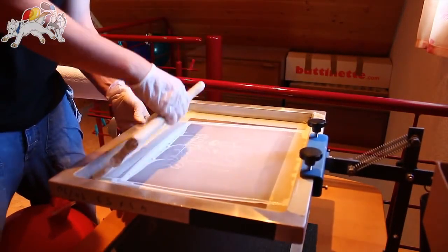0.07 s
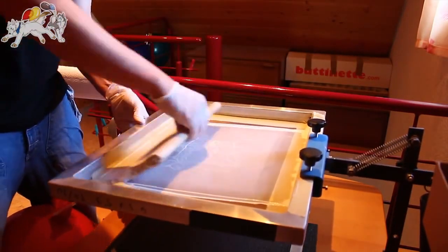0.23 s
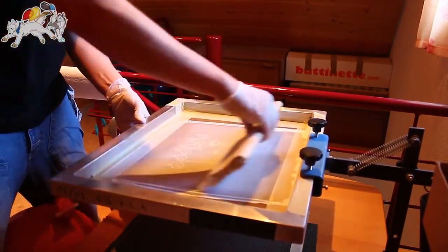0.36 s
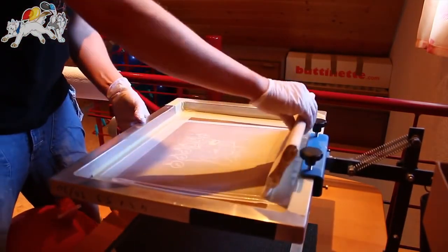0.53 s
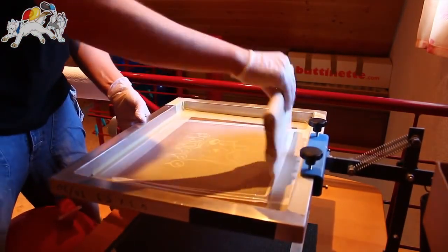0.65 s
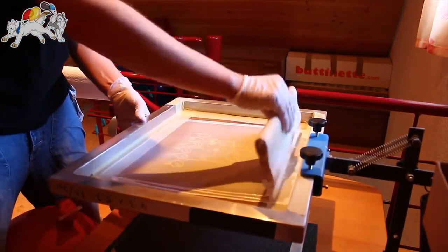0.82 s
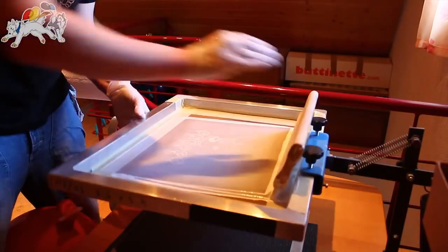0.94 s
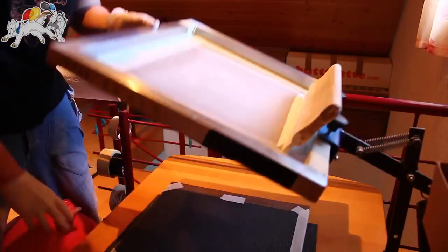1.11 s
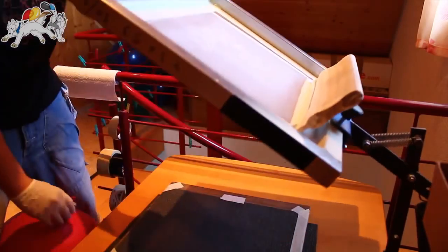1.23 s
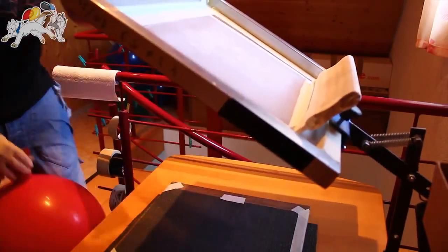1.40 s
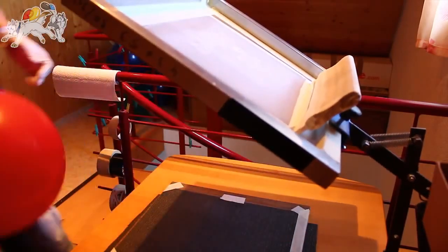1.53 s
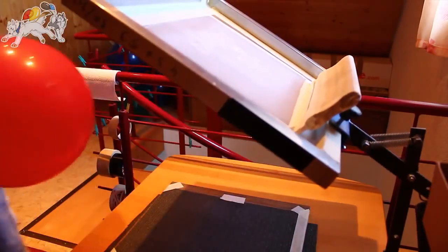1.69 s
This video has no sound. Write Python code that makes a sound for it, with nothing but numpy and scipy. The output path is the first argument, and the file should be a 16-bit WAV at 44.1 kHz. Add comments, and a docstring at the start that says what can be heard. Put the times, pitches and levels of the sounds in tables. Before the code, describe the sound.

A rubber squeegee taps, scrapes and squeaks across a mesh screen, then knocks down.

```python
"""Over faint room air, a rubber squeegee lands on a printing screen with a hollow tap, then scrapes and squeaks.
The blade zips over the mesh threads, so the squeak's pitch follows the speed of the stroke, down to a
juddering stop. The squeegee knocks on the frame and its handle tips back onto its rest. Cloth rustles,
the hinged frame is lifted with small clacks and creaks, and something bumps at the bench.
Short reflections and a brief tail place it all in a small wooden room."""
import sys
import numpy as np
from scipy import signal
from scipy.fft import rfft, irfft
from scipy.io import wavfile

SR = 44100
rng = np.random.default_rng(int(sys.argv[2]) if len(sys.argv) > 2 else 0)


def waveform_to_disk(signal):
    """Save audio, clipped to [-1, 1], as 16-bit WAV at the path in sys.argv[1]."""
    frames = np.transpose(np.atleast_2d(signal))
    scaled = np.clip(frames, -1, 1) * 32767
    samples = np.round(scaled).astype(np.int16)
    wavfile.write(sys.argv[1], SR, samples)


N = 77175
T = np.arange(N) / SR
FREQS = np.fft.rfftfreq(N, 1 / SR)


def amp(db):
    """Decibels to gain."""
    return 10 ** (np.asarray(db) / 20)


def unit_rms(x):
    """Scales to an rms of 1."""
    return x / np.sqrt(np.mean(x ** 2) + 1e-20)


def at_hz(points, hz):
    """Reads a curve along a log-frequency axis."""
    f, value = np.transpose(points)
    return np.interp(np.log(hz + 1), np.log(f + 1), value)


def automation(points):
    """Draws a control curve through (time, value) points."""
    return np.interp(T, *np.transpose(points))


def add(mix, start, sound):
    """Mixes a sound in at a time in seconds."""
    part = mix[round(start * SR):][:len(sound)]
    part += sound[:len(part)]


def eq(x, shape):
    """Minimum-phase EQ with a (frequency, gain) shape."""
    size = 2048
    log_gain = np.log(amp(at_hz(shape, abs(np.fft.fftfreq(size, 1 / SR)))))
    taps = np.fft.ifft(np.exp(np.conj(signal.hilbert(log_gain)))).real
    return signal.fftconvolve(x, taps[:size // 2])[:len(x)]


def wander(hz):
    """Smooth random modulation up to about the given rate, rms 1."""
    return unit_rms(irfft(rfft(rng.standard_normal(N)) * np.exp(-(FREQS / hz) ** 2), N))


def wavering_phase(hz, depth, rate_hz=687):
    """Phase of a tone whose pitch jitters by the fraction `depth`."""
    return 2 * np.pi * np.cumsum(hz * (1 + depth * wander(rate_hz))) / SR


def swell(start, end):
    """A half-sine fade in and out."""
    return np.sin(np.pi * np.clip((T - start) / (end - start), 0, 1))


def scrape(level, shape, grain_db, grain_hz):
    """Friction: noise made grainy by tiny slips, then shaped in tone and level."""
    slips = rng.standard_normal(N) * amp(grain_db * wander(grain_hz))
    return unit_rms(eq(slips, shape)) * amp(automation(level))


def knocks(hits, modes, rattle_eq, tick, low_cut_hz):
    """Each blow rings modes and a ticking rattle; soft ones are duller, the spot sets the first mode."""
    out, t = np.zeros(N), T[:SR // 2]
    impulse = 1. * (t == 0)
    first, *others = [(-1) ** k * amp(db - 60 * t / t60) * np.sin(2 * np.pi * hz * t)
                      for k, (hz, db, t60) in enumerate(modes)]
    eq_gain = np.linalg.norm(eq(impulse, rattle_eq))
    for start, ring_db, rattle_db, bright_hz, t60, first_db in hits:
        ring = amp(ring_db) * (amp(first_db) * first + sum(others))
        burst = rng.standard_normal(len(t)) * amp(-60 * t / t60) + tick * impulse
        rattle = amp(rattle_db) * eq(burst, rattle_eq) / eq_gain
        pole = np.exp(-2 * np.pi * bright_hz / SR)
        add(out, start, signal.lfilter([1 - pole], [1, -pole], ring + rattle))
    low_cut = signal.butter(1, low_cut_hz, "high", fs=SR, output="sos")
    return signal.sosfilt(low_cut, out)  # small objects radiate little bass


# stereo width of diffuse sound (frequency [Hz], left-right correlation [-1 to 1])
CORRELATION = [(30, -0.64), (300, 0.83), (1000, 0.67), (3000, 0.17), (15000, -0.06)]

def diffuse(shape):
    """Mid-side stereo noise with a (frequency, level) shape."""
    mid, side = rfft(rng.standard_normal((2, N))) * amp(at_hz(shape, FREQS))
    alike = np.clip(at_hz(CORRELATION, FREQS), -1, 1)
    mid, side = mid * np.sqrt((1 + alike) / 2), side * np.sqrt((1 - alike) / 2)
    return irfft(np.array([mid + side, mid - side]), N)


# tone of the room air (frequency [Hz], gain [dB]) and its fader (time [s], level [dB])
AIR_EQ = [(25, -19), (50, -34), (78, -11), (120, -41.5), (175, -9), (235, -14), (350, -1.5), (420, 0.5),
          (510, -13), (610, -3.5), (730, -12), (1500, -10.5), (2300, -15.5), (6000, -19), (16000, -24)]
AIR_LEVEL = [(0, -63.5), (.85, -63.5), (1.2, -60.5), (1.45, -59), (1.65, -59.5), (1.75, -55.5)]

def room_air():
    """A faint bed of air that comes up a little toward the end."""
    return unit_rms(diffuse(AIR_EQ)) * amp(automation(AIR_LEVEL))


# tone of the floor rumble (frequency [Hz], gain [dB]) and its fader (time [s], level [dB])
RUMBLE_EQ = [(20, -21), (50, -17.5), (78, -9), (130, -15.5), (300, -24.5), (1000, -61)]
RUMBLE_LEVEL = [(0, -104), (.33, -96.5), (.6, -98.5), (.85, -87), (.97, -71.5), (1.15, -89), (1.45, -83.5),
                (1.57, -68), (1.67, -76.5), (1.75, -85.5)]

def floor_rumble():
    """Low swells as weight shifts on the floor."""
    return unit_rms(diffuse(RUMBLE_EQ)) * amp(automation(RUMBLE_LEVEL))


# resonances of the mesh (frequency [Hz], level [dB], t60 [s])
MESH_MODES = [(354.8, 0, 0.1), (424.6, 1, 0.093), (583, -16, 0.1), (757, -8, 0.048), (830, -12.5, 0.11),
              (1045, -29, 0.12), (1178, -23.5, 0.19), (1444, -24.5, 0.19), (1860, -13.5, 0.065),
              (4070, -16, 0.012)]
# its dense ringing (frequency [Hz], gain [dB])
MESH_RATTLE = [(30, -36), (150, -19.5), (350, -1.5), (700, 4), (1000, 4.5), (1900, -7), (2600, -7.5),
               (3700, -3.5), (5000, -12), (8500, -11.5), (16000, -35)]
# touchdown (time [s], ring [dB], rattle [dB], brightness [Hz], rattle t60 [s], first mode [dB])
MESH_HITS = [(.1975, -65.5, -51.5, 8900, 0.28, 4), (.2150, -20.5, -31.5, 12200, 0.076, 1)]

def mesh_tap():
    """The blade grazes the mesh, then lands and sets it ringing."""
    return knocks(MESH_HITS, MESH_MODES, MESH_RATTLE, tick=1.5, low_cut_hz=124)


# tone of rubbing rubber (frequency [Hz], gain [dB]) and its fader (time [s], level [dB])
RUBBER_EQ = [(60, -34.5), (200, -38), (330, -26), (700, 5), (1300, 3.5), (1800, 5), (2600, 4.5),
             (4000, 4.5), (8000, 3.5), (11000, -3.5), (16000, -11)]
RUB_LEVEL = [(.275, -83), (.301, -40.5), (.314, -34), (.332, -36), (.339, -72.5), (.40, -56.5), (.45, -63),
             (.535, -58.5), (.56, -65), (.6, -93.5)]

def rubber_rub():
    """Rubber scrapes over the mesh, loudest as the stroke gets going."""
    return scrape(RUB_LEVEL, RUBBER_EQ, grain_db=0.5, grain_hz=900)


# resonances of the rubber blade (frequency [Hz], level [dB], t60 [s])
BLADE_MODES = [(1760, 3, 0.017), (409, -7, 0.045), (757, -3, 0.035), (1090, -3, .035), (2180, -5, 0.016)]
# snaps (time [s], ring [dB], rattle [dB], brightness [Hz], rattle t60 [s], first mode [dB])
BLADE_HITS = [(.322, -41, -33, 3000, 0.017, -6), (.3283, -29, -34.5, 5000, .025, 4),
              (.401, -49.5, -41, 1000, 0.033, -21.5)]

def blade_snaps():
    """The heavily damped blade snaps free as it starts to slide, and catches on the way."""
    return knocks(BLADE_HITS, BLADE_MODES, RUBBER_EQ, tick=1.6, low_cut_hz=130)


# speed of the stroke (time [s], thread-crossing rate [Hz])
THREAD_RATE = [(.322, 12500), (.331, 13400), (.343, 12000), (.352, 12600), (.362, 15100), (.378, 15600),
               (.397, 13590), (.409, 15000), (.430, 13450), (.442, 14830), (.456, 14500), (.475, 15050),
               (.503, 15100), (.514, 12800), (.525, 10750), (.534, 11270), (.544, 8000), (.555, 7564),
               (.565, 7700)]
# fader of the squeak (time [s], level [dB])
SQUEAK_LEVEL = [(.33, -20), (.351, -25.5), (.358, -34), (.403, -33.5), (.411, -22.5), (.445, -28.5),
                (.478, -29), (.497, -33), (.511, -23.5), (.534, -27), (.542, -29.5), (.55, -26),
                (.556, -34.5), (.563, -23), (.567, -73)]

def squeak(start_s=.329, attack_s=.0015, flutter_db=3.5, flutter_hz=250):
    """The blade ticks over the threads: a raspy, fluttering tone whose pitch follows its speed."""
    pitch = automation(THREAD_RATE)
    phase = wavering_phase(pitch, depth=0.01628)
    octave = amp(-19) * np.sin(2 * phase) * (pitch < SR / 4)  # muted where it would alias
    # a narrow and a wide band of noise ride along with the pitch
    rasp = sum(amp(db) * (wander(width_hz) * np.sin(phase) + wander(width_hz) * np.cos(phase))
               for db, width_hz in [(-16.5, 900), (-17.5, 4300)])
    level = amp(automation(SQUEAK_LEVEL) + flutter_db * wander(flutter_hz))
    gate = np.clip((T - start_s) / attack_s, 0, 1) * (T < SQUEAK_LEVEL[-1][0])
    return level * gate * (np.sin(phase) + octave + rasp)


# glides of the blade's slow end (start [s], end [s], first pitch [Hz], last pitch [Hz], level [dB])
TRAILING_GLIDES = [(0.34, 0.403, 12400, 12170, -35.5), (0.407, .445, 14000, 13350, -32),
                   (.528, 0.57, 11100, 11200, -34.5), (0.537, 0.553, 10460, 4540, -32.5),
                   (0.548, 0.559, 7130, 3200, -37), (0.553, 0.568, 3000, 1680, -57)]

def trailing_squeaks(flutter_db=1, flutter_hz=900):
    """The slower end of the blade drags behind in weaker, stuttering squeaks that dive as it stops."""
    out = np.zeros(N)
    for start, end, first_hz, last_hz, db in TRAILING_GLIDES:
        pitch = automation([(start, first_hz), (end, last_hz)])
        out += amp(db) * swell(start, end) * np.sin(wavering_phase(pitch, depth=0.03))
    return out * unit_rms(amp(flutter_db * wander(flutter_hz)))


# tone of the judder (frequency [Hz], gain [dB]) and its fader (time [s], level [dB])
JUDDER_EQ = [(60, -70), (300, -47.5), (430, -6.5), (600, -34), (1300, -21), (1650, -1.5), (2600, -4),
             (4500, -3.5), (7000, 1.5), (11000, -7), (16000, -29)]
JUDDER_LEVEL = [(.533, -78), (.543, -49), (.553, -47), (.566, -35.5), (.578, -41.5), (.6, -105)]

def judder():
    """A coarse scrape as the blade stops against the frame."""
    return scrape(JUDDER_LEVEL, JUDDER_EQ, grain_db=5.5, grain_hz=700)


# resonances of the hinge clamps (frequency [Hz], level [dB], t60 [s])
HINGE_MODES = [(443, 3.5, 0.036), (658, 2, 0.033), (1042, -26, .06), (1149, -3.5, 0.1), (1282, -12, 0.11)]
# dense ringing of the frame, shared by hinge, frame and handle hits (frequency [Hz], gain [dB])
FRAME_RATTLE = [(30, -45), (160, -17.5), (270, 1.5), (750, -2), (1000, 4), (1600, -3), (2300, -10),
                (4400, -6.5), (5600, -19), (8000, -18), (16000, -31)]
# clacks (time [s], ring [dB], rattle [dB], brightness [Hz], rattle t60 [s], first mode [dB])
HINGE_HITS = [(.615, -55.5, -57.5, 1800, 0.055, 2), (1.148, -53.5, -52.5, 1500, 0.038, 2),
              (1.267, -44.5, -43.5, 1500, 0.05, -0.5), (1.279, -48.5, -53, 900, 0.12, 5.5),
              (1.393, -53, -45.5, 4500, 0.056, 0), (1.404, -47, -54, 1620, 0.083, 0)]

def hinge_clacks():
    """The frame shifts in its hinge clamps."""
    return knocks(HINGE_HITS, HINGE_MODES, FRAME_RATTLE, tick=2.3, low_cut_hz=203)


# resonances of the frame (frequency [Hz], level [dB], t60 [s])
FRAME_MODES = [(410, 1, 0.21), (350, -5.5, 0.038), (639, -9, 0.14), (902, -6, 0.042), (1074, -11.5, 0.16),
               (1367, -7, 0.059), (1402, -8, 0.11), (1510, 0, 0.063), (1650, -8, 0.054),
               (1779, -5.5, 0.077), (1915, -9, 0.082), (2430, -13, 0.069)]
# contacts (time [s], ring [dB], rattle [dB], brightness [Hz], rattle t60 [s], first mode [dB])
FRAME_HITS = [(.893, -56.5, -31, 12000, 0.054, 5), (.8985, -24, -27.5, 12060, 0.072, -0.5)]

def frame_knock():
    """The squeegee strikes the frame in a tight, bright flam."""
    return knocks(FRAME_HITS, FRAME_MODES, FRAME_RATTLE, tick=1.6, low_cut_hz=170)


# brushes of glove and clothes (time [s], level [dB], fade time [s])
RUSTLES = [(0.966, -51, 0.091), (1.318, -50, 0.028), (1.443, -65, 0.1), (1.528, -51.5, 0.11),
           (1.613, -48.5, 0.06)]
# tone of the cloth (frequency [Hz], gain [dB])
CLOTH_EQ = [(100, -29), (1500, -5), (5000, -3.5), (11000, 0), (16000, -4)]

def cloth_rustles(attack_s=0.014, fade_db=-34, grain_db=3, grain_hz=400):
    """Glove and clothes brush in short, soft puffs of grainy noise."""
    level = np.zeros(N)
    for start, db, fade_s in RUSTLES:
        t = T[T < 2 * fade_s]
        add(level, start, np.minimum(t / attack_s, 1) * amp(db + fade_db * t / fade_s))
    hiss = unit_rms(eq(rng.standard_normal(N), CLOTH_EQ))
    return level * hiss * amp(grain_db * wander(grain_hz))


# resonances of the handle (frequency [Hz], level [dB], t60 [s])
HANDLE_MODES = [(411, -3, 0.14), (656, -1.5, 0.23), (575, -12.5, 0.26), (830, 1, 0.038), (950, -4, 0.038),
                (1026, -1.5, 0.058), (1500, -4, 0.046), (2695, -8, 0.054), (3200, -7.5, 0.053)]
# contacts (time [s], ring [dB], rattle [dB], brightness [Hz], rattle t60 [s], first mode [dB])
HANDLE_HITS = [(1.0245, -43.5, -34.5, 9100, 0.081, 7), (1.027, -30, -40, 1510, 0.071, 1)]

def handle_knock():
    """The wooden handle tips back onto its rest."""
    return knocks(HANDLE_HITS, HANDLE_MODES, FRAME_RATTLE, tick=1.3, low_cut_hz=282)


# faint ringing and creaking of the frame (start [s], length [s], pitch [Hz], level [dB])
CREAKS = [(1.12, 0.38, 1118, -62), (1.285, 0.045, 1258, -58), (1.624, 0.067, 544, -53)]

def creaks():
    """Thin, wavering tones as the frame is lifted."""
    return sum(amp(db) * swell(start, start + length) * np.sin(wavering_phase(hz, depth=0.049))
               for start, length, hz, db in CREAKS)


# resonances of the bench (frequency [Hz], level [dB], t60 [s])
BENCH_MODES = [(216, -2.5, 0.044), (160, -17, 0.095), (397, -6.5, 0.13), (483, -1, 0.035),
               (564, -10, 0.088), (1059, 1, 0.063), (1223, -16, 0.064)]
# its dense ringing (frequency [Hz], gain [dB])
BENCH_RATTLE = [(30, -40), (90, -6.5), (500, 4), (1100, -0.5), (1600, -3), (2200, -10.5), (5000, -10.5),
                (8000, -15.5), (16000, -26)]
# bumps (time [s], ring [dB], rattle [dB], brightness [Hz], rattle t60 [s], first mode [dB])
BENCH_HITS = [(1.539, -53, -50, 9000, 0.18, -16), (1.567, -56, -49, 3030, 0.078, -16),
              (1.595, -54.5, -52.5, 3000, 0.077, 0.5), (1.697, -33.5, -41, 790, 0.071, 2.5),
              (1.706, -41, -37, 12000, 0.087, -1.5), (1.719, -34.5, -46, 9000, 0.23, -22)]

def bench_bumps():
    """Something bumps at the bench: a light cluster, then a heavier one."""
    return knocks(BENCH_HITS, BENCH_MODES, BENCH_RATTLE, tick=3, low_cut_hz=130)


# early reflections (delay [s], left [dB], right [dB]) and their tone (frequency [Hz], gain [dB])
REFLECTIONS = [(.0031, -8, -46), (.0066, -35, -8), (0.0115, -15.5, -15.5), (.0205, -15, -23)]
REFLECTION_EQ = [(100, -9), (600, -0.5), (2000, -6.5), (8000, 0), (16000, 3)]
# decay of the reverb tail (frequency [Hz], t60 [s]) and its send (frequency [Hz], level [dB])
TAIL_T60 = [(200, 0.31), (350, 0.29), (700, 0.28), (2000, 0.18), (8000, 0.2), (15000, 0.15)]
TAIL_SEND = [(100, -2.5), (500, -16.5), (2000, -9), (8000, -10), (15000, -5.5)]

def room(x, tail_attack_s=0.01):
    """Direct sound, a few reflections off screen and ceiling, and a short tail."""
    early, reflected = np.array([x, x]), eq(x, REFLECTION_EQ)
    for delay_s, left_db, right_db in REFLECTIONS:
        add(early[0], delay_s, amp(left_db) * reflected)
        add(early[1], delay_s, amp(right_db) * reflected)
    hz, t, bands = signal.stft(diffuse(TAIL_SEND), SR, nperseg=256)
    t60 = at_hz(TAIL_T60, hz)[:, None]
    trim = np.sqrt(2 * np.log(1000) / (t60 * SR))  # a longer decay adds no energy
    tail = signal.istft(bands * amp(-60 * t / t60) * trim, SR, nperseg=256)[1][:, :N]
    tail *= np.minimum(T / tail_attack_s, 1)
    return early + signal.fftconvolve(x[None], tail, axes=1)[:, :N]


def scene():
    """The stroke and the handling play through the room, over a bed of air and rumble."""
    bed = room_air() + floor_rumble()
    stroke = mesh_tap() + rubber_rub() + blade_snaps() + squeak() + trailing_squeaks() + judder()
    handling = hinge_clacks() + frame_knock() + cloth_rustles() + handle_knock() + creaks() + bench_bumps()
    return bed + room(stroke + handling)


# stereo balance (frequency [Hz], left minus right [dB])
BALANCE = [(50, -1.5), (350, -4.5), (700, -2.5), (1500, -1), (3000, 0), (15000, -0.3)]
# lead of the left microphone (frequency [Hz], phase [rad])
LEFT_LEAD = [(30, 0.42), (260, 0.74), (700, 0.0063), (3000, 0.5), (16000, 0)]

def record(dry, high_cut_hz=16200):
    """Two microphones, a little apart in level and phase, then a steep high cut."""
    left = amp(at_hz(BALANCE, FREQS) / 2) * np.exp(1j * at_hz(LEFT_LEAD, FREQS) / 2)
    stereo = irfft(rfft(dry) * np.array([left, 1 / left]), N)
    high_cut = signal.firwin(511, high_cut_hz, window=("kaiser", 9), fs=SR)
    return signal.oaconvolve(stereo, high_cut[None], "same")


dry = scene()
out = record(dry)
waveform_to_disk(out)
```